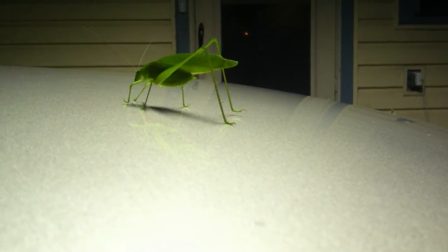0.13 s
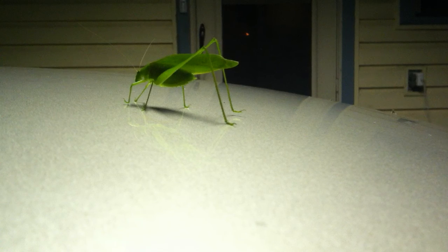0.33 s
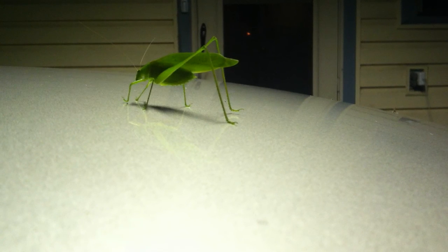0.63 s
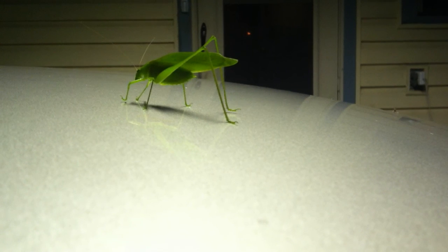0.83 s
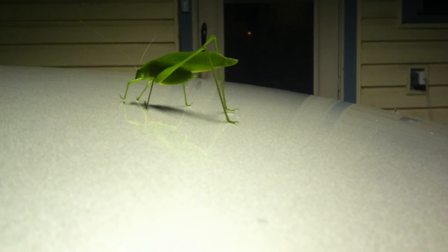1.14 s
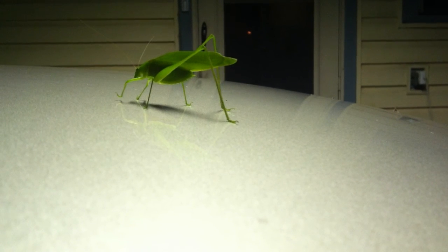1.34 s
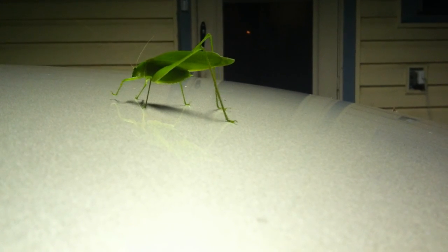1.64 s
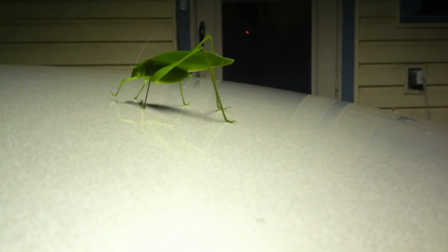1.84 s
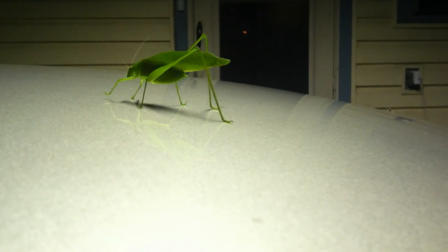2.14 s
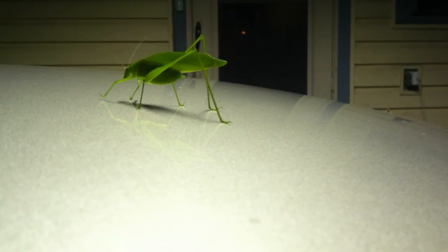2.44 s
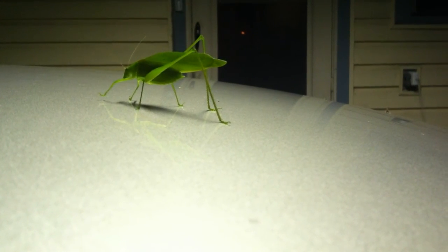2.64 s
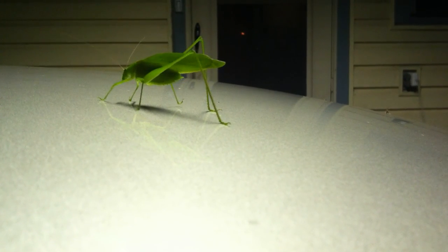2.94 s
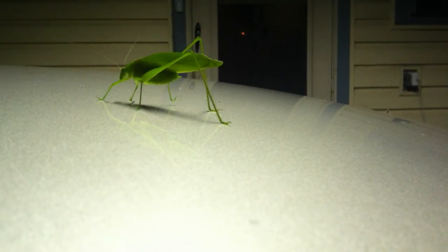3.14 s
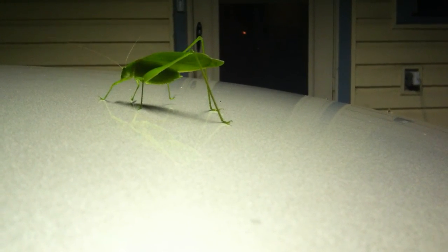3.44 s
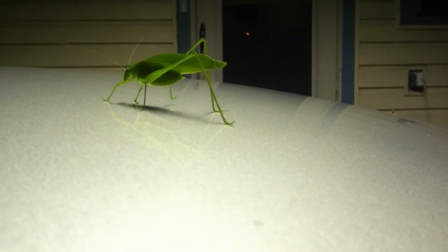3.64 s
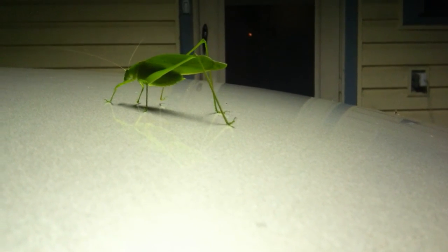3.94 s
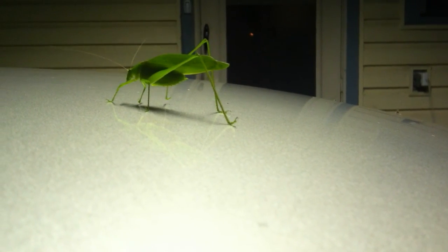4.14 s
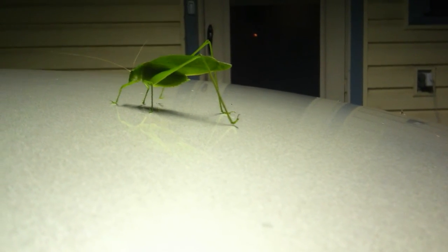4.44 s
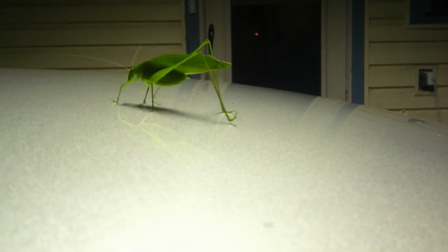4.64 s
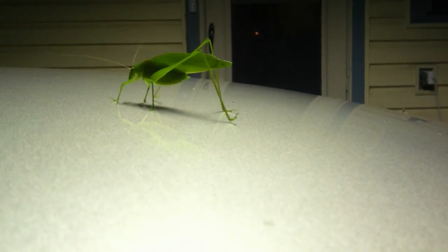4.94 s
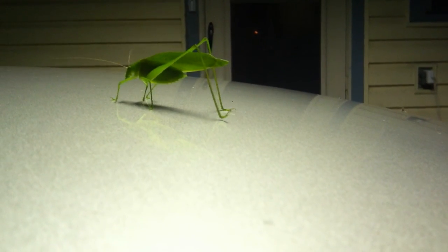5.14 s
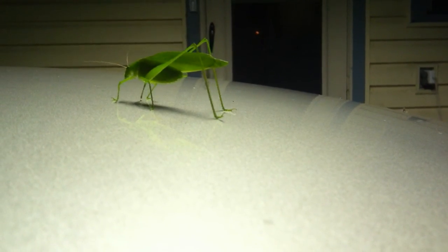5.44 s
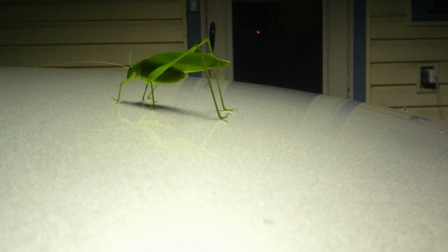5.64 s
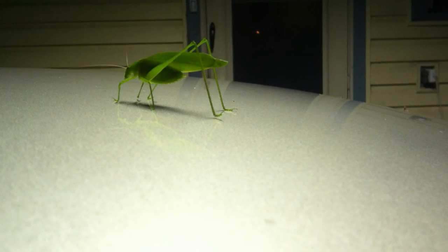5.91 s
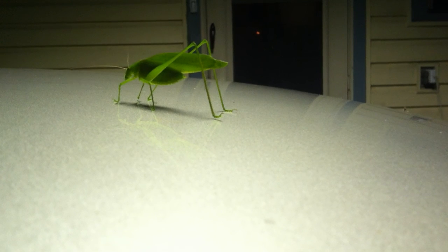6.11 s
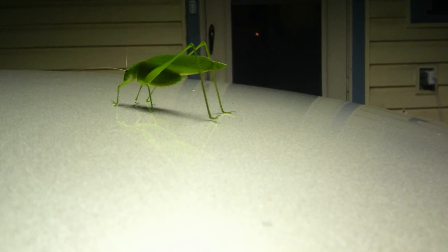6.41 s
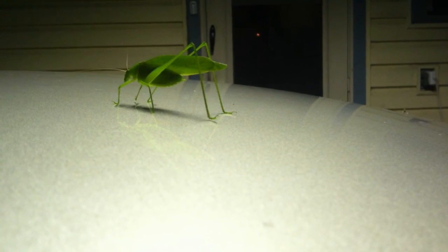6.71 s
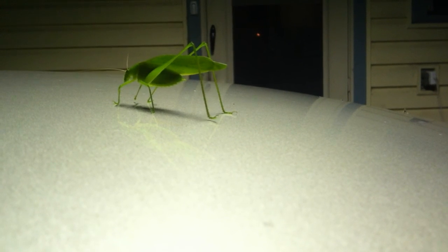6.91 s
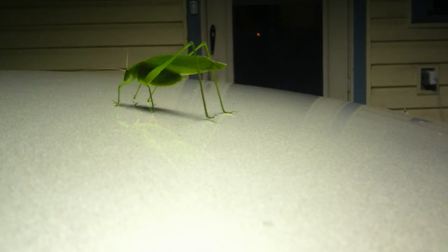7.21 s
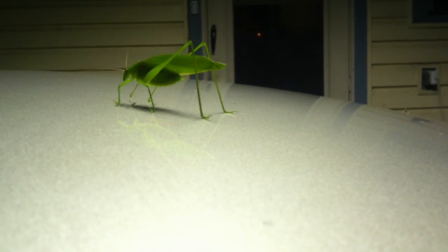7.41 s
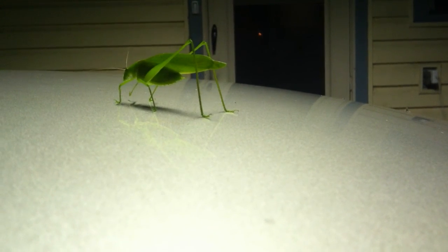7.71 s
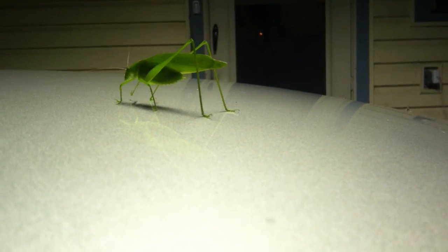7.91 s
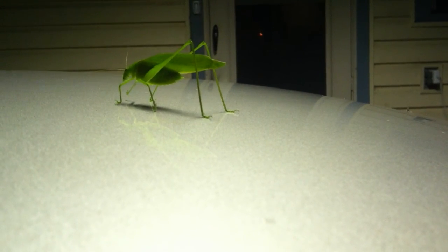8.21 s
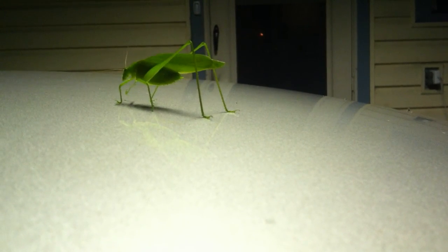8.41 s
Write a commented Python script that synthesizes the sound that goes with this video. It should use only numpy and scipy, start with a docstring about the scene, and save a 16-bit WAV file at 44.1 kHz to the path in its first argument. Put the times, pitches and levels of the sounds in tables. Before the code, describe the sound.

Katydids rasp in rhythmic bouts over a distant chorus, amid a continuous cricket shimmer, steady high chirping and occasional short electric-sounding insect buzzes at night.

```python
"""Summer night beside a wooden house

Katydids rasp in bouts from the trees, the near ones in step with a far chorus: toothed files click and ring wings.
Crickets trill without a break as trains of gliding sine tones; two insects chirp at their own pace and
another winds up a short buzz now and then: the chirps and the buzz come from pulses through wing resonances.
Under it all lie a faint machine hum of wavering sines and the rumble of the neighbourhood, filtered noise."""
import sys
import numpy as np
from scipy import signal
from scipy.fft import rfft, irfft, next_fast_len
from scipy.io import wavfile
from scipy.ndimage import uniform_filter1d

SR = 44100
rng = np.random.default_rng(int(sys.argv[2]) if len(sys.argv) > 2 else 0)


def log_audio(samples):
    """Write samples as a 16-bit WAV file to the path given in sys.argv[1]."""
    # one column per channel
    frames = np.atleast_2d(samples).T
    # limit to full scale, then quantise
    limited = np.clip(frames, -1, 1)
    pcm = np.round(limited * 32767).astype(np.int16)
    wavfile.write(sys.argv[1], SR, pcm)


N = 377496
TIME = np.arange(N) / SR  # s
EDGE_HZ = 15700

# Spectra radiated by katydid wings; only the shape counts: frequency_hz, relative_level_db
NEAR_WING_SPECTRUM = [(1200, -36), (1800, -18.5), (2000, -10), (2400, -19), (2790, -4), (2915, 4),
                      (3000, 1.5), (3080, 1.5), (3250, -6), (3600, -11.5), (3850, -6), (4080, -.5),
                      (4300, -3.5), (4430, -8), (4620, -9), (4800, -14.5), (5200, -16.5), (6000, -26),
                      (9500, -48), (12000, -35), (15500, -54)]
DEEP_WING_SPECTRUM = [(1200, -25), (1950, -22), (2085, -5), (2150, -3), (2240, -17), (2450, -10), (2550, 1),
                      (2700, -9), (2820, -21), (2940, -3.5), (3300, -7.5), (3600, -20), (3750, -6),
                      (4100, -8), (4240, 0), (4400, -9), (4650, 2.5), (4800, -7), (5400, -10.5),
                      (6000, -20), (9500, -46), (12000, -47), (15500, -39)]
FAR_WING_SPECTRUM = [(1200, -34.5), (1800, -22.5), (2040, 4), (2300, -13.5), (2800, -3.5), (3500, -12),
                     (4400, -1), (5600, -14), (8000, -46), (15500, -53)]
CHORUS_WING_SPECTRUM = [(1000, -25), (1700, -15), (2000, 1.5), (2200, -2.5), (2480, -3.5), (2740, 3.5),
                        (3080, 2.5), (3600, -6.5), (4280, 2), (5000, -1.5), (5700, -5.5), (7500, -24),
                        (10000, -35), (11800, -28), (15500, -39)]
# Wing strokes of the nearest and of a deeper-voiced katydid: middle_s, level_db (before the layer's gain)
NEAR_STROKES = [(0.049, -51), (1.119, -52), (1.212, -51.5), (1.306, -51.5), (2.214, -51.5), (2.314, -51),
                (2.401, -50), (3.266, -50.5), (3.369, -53), (3.462, -50), (4.335, -57), (4.411, -51.5),
                (4.503, -53.5), (4.595, -52.5), (5.482, -51.5), (5.573, -53), (5.661, -53.5),
                (5.755, -50.5), (7.168, -51), (7.262, -54), (7.343, -52.5), (7.442, -51)]
DEEP_STROKES = [(0.25, -51), (0.328, -51), (0.42, -50.5), (1.306, -53.5), (1.409, -50.5), (1.494, -50.5),
                (2.34, -54), (2.451, -51.5), (2.52, -53.5), (3.212, -50.5), (3.319, -54), (3.404, -50.5),
                (4.274, -54), (4.377, -50.5), (4.47, -52.5), (5.33, -51.5), (5.434, -51.5), (5.522, -52.5),
                (6.481, -52), (6.565, -50.5), (6.665, -55), (7.188, -52.5), (7.278, -52.5), (7.379, -53)]
# A katydid's short false starts before a bout: middle_s, level_db (before the layer's gain)
FALSE_STARTS = [(2.149, -48), (7.099, -47)]
# Bouts farther off: first_stroke_s, strokes (rounded), gap_s, level_db (before stroke and layer gains)
FAR_BOUTS = [(0.17, 1, .094, -52), (1.576, 2, 0.1, -54), (2.003, 1, .1, -58), (2.601, 1, .09, -57),
             (2.953, 3, 0.088, -52), (4.046, 3, 0.083, -53.5), (4.74, 3, 0.081, -59), (5.222, 1, 0.09, -54),
             (5.647, 3, 0.11, -62), (6.39, 1, 0.09, -50), (6.755, 3, 0.065, -54.5),
             (8.265, 4.8, 0.083, -52.5)]
# Swells of the distant chorus: middle_s, length_s, level_db (before the layer's gain)
CHORUS_SWELLS = [(0.355, 0.28, -63), (1.423, 0.37, -63), (2.48, 0.37, -62.5), (3.317, 0.27, -64.5),
                 (4.39, 0.38, -67.5), (5.495, 0.42, -64.5), (6.533, 0.34, -64), (7.304, 0.31, -64.5)]
# Steadier chorus that the swells add to: time_s, level_db (before the layer's gain)
CHORUS_BED = [(0, -63), (0.64, -65), (0.9, -62), (1.6, -66.5), (1.85, -63), (2.2, -65), (2.85, -65),
              (3.5, -62.5), (3.85, -68.5), (4.0, -61.5), (4.7, -62), (5.05, -64.5), (5.7, -62), (6.05, -65),
              (7.05, -65), (7.75, -62.5), (8.18, -64.5), (8.56, -63.5)]
# Trilling crickets: pitch_hz, syllables_per_s, relative_level_db
CRICKETS = [(5910, 39, -4), (6120, 65.5, 2.5), (6160, 110, -3), (6250, 81.3, -0.5), (6245, 34.5, -2),
            (6460, 30, -4.5)]
# Spectrum of the trill through the bushes: frequency_hz, relative_level_db
TRILL_SPECTRUM = [(4500, -28), (5740, -13), (5920, -5.5), (6100, -5.5), (6350, -3.5), (6550, -4),
                  (6900, -9), (8000, -25), (12000, -35)]
# Chirps of the slow, loud chirper: middle_s, length_s, level_db
SLOW_CHIRPS = [(0.03, .12, -55), (0.39, 0.18, -53), (0.71, 0.14, -54.5), (1.0, .21, -56), (1.42, .28, -55),
               (1.8, 0.28, -54.5), (2.16, 0.26, -55.5), (2.6, 0.41, -56), (2.88, 0.18, -53.5),
               (3.19, .19, -52), (3.61, .17, -52.5), (4.0, 0.23, -54.5), (4.34, .22, -54),
               (4.74, 0.24, -55), (5.03, 0.23, -56), (5.42, 0.24, -55.5), (5.83, 0.2, -56),
               (6.2, 0.23, -54), (6.54, 0.22, -54.5), (6.9, .26, -57), (7.28, .13, -53.5),
               (7.64, 0.26, -54.5), (8.0, .27, -54), (8.38, .24, -55.5)]
# Beat of the quick, thin chirper: first_chirp_s, gap_s, added_to_each_gap_s
QUICK_BEAT = (0.159, 0.217, 0.00013)
# Buzzes that swell and break off: start_s, end_s, top_level_db (before the treble is dulled)
BUZZES = [(1.92, 2.13, -64), (2.66, 2.858, -70), (3.118, 3.49, -55), (5.66, 5.89, -67), (6.77, 7.04, -54.5)]
# Wing spectra of the chirpers and the buzzer: frequency_hz, relative_level_db
SLOW_WING_SPECTRUM = [(5400, -37), (5780, -15), (5950, -3), (6100, 3.5), (6200, 1.5), (6320, 11),
                      (6430, 4.5), (6520, -9), (6620, -10), (6800, -14.5), (7600, -49.5)]
QUICK_WING_SPECTRUM = [(7000, -41), (8100, -16), (8470, 4.5), (8800, -9), (9300, -9), (10500, -47)]
BUZZ_WING_SPECTRUM = [(5700, -33), (6300, -7), (6500, -6), (6560, 9), (6605, -5), (6645, 4), (6685, -9.5),
                      (6732, 6), (6780, -4), (6826, 12), (6865, -5.5), (6900, 6), (6930, 0), (6958, 5),
                      (7020, -5), (7083, 3), (7160, -16), (7225, 0), (7360, -16), (7450, -12), (7700, -22),
                      (8300, -26), (11000, -54)]
# Spectra of the neighbourhood rumble and of the roar: frequency_hz, relative_level_db
RUMBLE_SPECTRUM = [(20, -22), (45, -33), (70, -20), (100, -15.5), (135, -4.5), (165, 1), (220, -0.5),
                   (300, -4), (550, -11), (1100, -16.5), (1700, -15), (4000, -21.5), (8500, -26.5),
                   (10500, -41), (15500, -57)]
ROAR_SPECTRUM = [(100, -24), (230, -6), (380, 3), (600, -2.5), (1100, -17), (3000, -42)]
# A soft low roar of wind or far traffic that comes and goes: time_s, level_db
ROAR_LEVEL = [(0, -76), (2.5, -90), (4.2, -83), (4.85, -68), (5.25, -65.5), (5.55, -79), (7.9, -79.5),
              (8.56, -66)]
# Machine hum: frequency_hz, level_db, waver (rms share of the frequency)
HUM = [(120, -77.5, 0.0024), (155.2, -76.5, 0.0063), (239.4, -74.5, 0.0013), (480, -79.5, 0.008),
       (660, -87.5, 0.00097)]


def katydid(rows, wing, length, teeth_per_s, jitter, wet, t60, level_db):
    """Stridulation: each stroke drags the file's teeth over the scraper and rings the leathery wing."""
    clicks = strikes(teeth_per_s, jitter, uneven_db=1.5)
    rasp = steadied(ringing(clicks, wing), span_s=0.007)
    sung = rasp * strokes(rows, length, lead=0.0028)
    return gain_of(level_db) * scattered(sung, wet, t60, count=8)


def wing_note(rows, hz, waver, length, wet, level_db):
    """Sharp resonance: the deep katydid's wing adds one narrow, slightly unsteady note to each stroke."""
    pitch = hz * (1 + waver * drift(170))
    note = np.sqrt(2) * np.sin(2 * np.pi * np.cumsum(pitch) / SR)
    sung = note * strokes(rows, length, lead=0.002)
    return gain_of(level_db) * scattered(sung, wet, t60=0.15, count=8)


def bouts(rows, level_slope_db, first_stroke_db):
    """Rhythmic grouping: evenly spaced strokes, with a level step per stroke and one for the first; (s, dB) rows."""
    stroke_rows = []
    for first, count, gap, db in rows:
        for k in range(round(count)):
            slope_db = level_slope_db * (k - (count - 1) / 2)
            stroke_rows.append((first + k * gap, db + slope_db + first_stroke_db * (k == 0)))
    return stroke_rows


def chorus(level_db, throb_db, strokes_per_s):
    """Incoherent summation: many far katydids swell together, their strokes out of step."""
    voices = np.zeros(N)
    for pace in np.linspace(.92, 1.08, num=6):
        stroke_rate = strokes_per_s * pace * (1 + 0.06 * drift(1.983))
        beat = np.cumsum(stroke_rate) / SR + rng.random()
        throb = gain_of(throb_db * np.sin(2 * np.pi * beat))
        voices += strikes(420 * pace, jitter=.3, uneven_db=2.5) * throb
    spread = scattered(voices - voices.mean(), wet=0.36, t60=0.17, sway_per_s=40, count=16)
    wash = ringing(spread, CHORUS_WING_SPECTRUM)
    swells = sum(strokes([(s, db)], length, lead=0) for s, length, db in CHORUS_SWELLS)
    bed = gain_of(np.interp(TIME, *np.transpose(CHORUS_BED)))
    return gain_of(level_db) * wash * (bed + swells)


def trill(level_db, glide, sharpness, wet, waver_db):
    """Amplitude and frequency modulation: each wing closure is a falling tone, smeared by the bushes."""
    voices = np.zeros(N)
    for hz, per_s, db in CRICKETS:
        cycle = (np.cumsum(per_s * (1 + .025 * drift(5))) / SR + rng.random()) % 1
        pitch = hz * (1 + glide * (.5 - cycle) + .013 * drift(450))
        syllables = np.sin(np.pi * cycle) ** (2 * sharpness)
        tone = np.sin(2 * np.pi * np.cumsum(pitch) / SR)
        voices += gain_of(db) * evened(syllables * tone)
    song = coloured(scattered(voices, wet, t60=0.37, sway_per_s=90, count=6), TRILL_SPECTRUM)
    even = steadied(song, span_s=0.022)
    return gain_of(level_db + waver_db * drift(16)) * even


def chirper(rows, wing, pulses_per_s, wet, linger):
    """Resonant excitation: bursts of even pulses ring a narrow wing and die away among the trees."""
    pulses = strikes(pulses_per_s, jitter=.06, uneven_db=0.5)
    ring = scattered(ringing(pulses, wing), wet, t60=0.4, sway_per_s=40)
    pressure = sum(strokes([(s, db)], length, lead=0.012) for s, length, db in rows)
    # The burst's power decays with the time constant linger (s)
    keep = np.exp(-1 / (linger * SR))
    power = signal.lfilter([1 - keep], [1, -keep], pressure ** 2)
    return steadied(ring, span_s=0.027) * np.sqrt(power)


def chirps(beat, length, level_db, uneven_db, stray_s):
    """Slowing pulse: chirps on a lengthening beat, uneven in time and force; (s, length s, dB) rows."""
    first, gap, slowing = beat
    k = np.arange(int(TIME[-1] / gap) + 1)
    late, force = rng.standard_normal((len(k), 2)).T
    middle = first + k * (gap + slowing * k / 2) + stray_s * late
    return np.column_stack([middle, np.full(len(k), length), level_db + uneven_db * force])


def buzzer(pulses_per_s, rise_db, release, bright_hz, dulling_per_khz):
    """Force-dependent brightness: a fast pulse train gains force and treble in an arch, then dies away."""
    force = np.zeros(N)
    for start, end, db in BUZZES:
        to_go = np.clip((end - TIME) / (end - start), 0, 2)
        dying = np.clip((TIME - end) / release, 0, 20)
        force += gain_of(db - rise_db * to_go ** 2.6) * np.exp(1 - np.hypot(1, dying))
    pulses = strikes(pulses_per_s, jitter=0.12, uneven_db=0.0)
    pulses = scattered(pulses, wet=0.5, t60=0.055, sway_per_s=60, count=8)
    ring = steadied(ringing(pulses, BUZZ_WING_SPECTRUM), span_s=0.012)
    # The weaker the force, the more the treble above bright_hz is dulled
    hz, t, z = signal.stft(ring, SR, nperseg=256)
    above_khz = np.maximum(hz - bright_hz, 0)[:, None] / 1000
    z = z * np.interp(t, TIME, force / force.max()) ** (dulling_per_khz * above_khz)
    return force * signal.istft(z, SR, nperseg=256)[1][:N]


def neighbourhood(rumble_db):
    """Broadband noise and tones: an even low rumble, a far roar that comes and goes, a wavering machine hum."""
    rumble = gain_of(rumble_db) * coloured(rng.standard_normal(N), RUMBLE_SPECTRUM)
    roar_gain = gain_of(np.interp(TIME, *np.transpose(ROAR_LEVEL)))
    roar = roar_gain * coloured(rng.standard_normal(N), ROAR_SPECTRUM)
    hum = np.zeros(N)
    for hz, db, waver in HUM:
        turns = np.cumsum(hz * (1 + waver * drift(14))) / SR
        hum += gain_of(db) * evened(gain_of(0.6 * drift(11.0)) * np.sin(2 * np.pi * turns))
    return rumble + roar + hum


def strikes(per_s, jitter, uneven_db):
    """Impulsive excitation: clicks of a scraper running over a file at a slightly unsteady speed."""
    gap, force = rng.standard_normal(size=(2, 8192))
    at = np.cumsum(np.maximum(1 + jitter * gap, .1)) * SR / per_s
    heard = at < N
    return np.bincount(at[heard].astype(int), gain_of(uneven_db * force[heard]), minlength=N)


def strokes(rows, length, lead):
    """Amplitude envelope: a round-shouldered swell, centred lead s early, for each (s, dB) row."""
    pressure = np.zeros(N)
    for s, db in rows:
        begin = max(int((s - lead - length) * SR), 0)
        end = max(int((s - lead + length) * SR), 0)
        offset = TIME[begin:end] - s + lead
        pressure[begin:end] += gain_of(db) * np.exp(-abs(2 * offset / length) ** np.pi)
    return pressure


def ringing(x, points):
    """Minimum-phase resonance: each click starts sharply and dies away, by (Hz, dB) points; rms 1."""
    hz, db = np.transpose(points)
    log_hz = np.log(abs(np.fft.fftfreq(8192, 1 / SR)) + 1)
    log_gain = np.log(gain_of(np.interp(log_hz, np.log(hz), db)))
    # The Hilbert transform of the log gain gives the phase
    response = np.fft.ifft(np.exp(np.conj(signal.hilbert(log_gain)))).real
    return evened(signal.oaconvolve(x, response[:len(response) // 2])[:N])


def scattered(x, wet, t60, sway_per_s=12, count=4):
    """Multipath scattering: direct sound plus weak echoes off leaves and walls on shifting paths; keeps energy."""
    t = TIME[:SR // 3]
    present = rng.random((count, len(t))) < 2000 / SR  # about 2000 echoes per s
    taps = rng.standard_normal((count, len(t))) * present
    taps *= np.exp(-np.log(1000) * t / t60)  # down 60 dB after t60 s
    taps /= np.linalg.norm(taps, axis=1, keepdims=True)
    shares = np.array([drift(sway_per_s) for _ in taps])
    shares /= np.linalg.norm(shares, axis=0)
    echoes = signal.oaconvolve(x * shares, taps, axes=1)[:, :N].sum(0)
    wet = np.clip(wet, 0, 1)
    return np.sqrt(1 - wet) * x + np.sqrt(wet) * echoes


def coloured(x, points):
    """Linear filtering: shapes the spectrum by (Hz, dB) points; rms 1."""
    hz, db = np.transpose(points)
    size = next_fast_len(N, real=True)
    log_hz = np.log(np.fft.rfftfreq(size, 1 / SR) + 1)
    gain = gain_of(np.interp(log_hz, np.log(hz), db))
    return evened(irfft(rfft(x, size) * gain, size)[:N])


def steadied(x, span_s):
    """Short-time power normalization: evens the loudness over span_s, keeps finer grain; rms about 1."""
    size = max(int(span_s * SR), 2)
    power = uniform_filter1d(uniform_filter1d(x ** 2, size), size)
    return x / np.sqrt(abs(power) + 1e-12)


def drift(per_s):
    """Random modulation: a fluctuation of rms 1 with per_s new random values a second."""
    knots = rng.standard_normal(4096)
    return evened(np.interp(TIME * per_s, np.arange(len(knots)), knots))


def evened(x):
    """Power normalization: scales to rms 1."""
    return x / np.sqrt(np.mean(x ** 2) + 1e-20)


def gain_of(db):
    """Logarithmic level: decibels to amplitude."""
    return np.exp(np.asarray(db) * np.log(10) / 20)


def scene():
    """Superposition: all the singers over the night's floor."""
    near = katydid(NEAR_STROKES, NEAR_WING_SPECTRUM, length=0.059, teeth_per_s=440, jitter=.18,
                   wet=0.24, t60=0.28, level_db=0.8)
    false_starts = katydid(FALSE_STARTS, NEAR_WING_SPECTRUM, length=0.0094, teeth_per_s=550, jitter=.18,
                           wet=0.22, t60=.2, level_db=-3.0)
    deep = katydid(DEEP_STROKES, DEEP_WING_SPECTRUM, length=0.055, teeth_per_s=425, jitter=.18,
                   wet=0.3, t60=0.17, level_db=-3.5)
    deep += wing_note(DEEP_STROKES, hz=2128, waver=0.0221, length=0.05, wet=.1, level_db=-5.5)
    # Apart from a softer first stroke, each far stroke is a little softer than the one before
    far_strokes = bouts(FAR_BOUTS, level_slope_db=-0.5, first_stroke_db=-1.5)
    far = katydid(far_strokes, FAR_WING_SPECTRUM, length=0.064, teeth_per_s=420, jitter=.25,
                  wet=0.6, t60=0.23, level_db=-2.5)
    distant = chorus(level_db=6.0, throb_db=2, strokes_per_s=10.6)
    crickets = trill(level_db=-53.5, glide=0.086, sharpness=2.0, wet=0.39, waver_db=0.6)
    slow = chirper(SLOW_CHIRPS, SLOW_WING_SPECTRUM, pulses_per_s=187, wet=0.47, linger=0.0098)
    quick_chirps = chirps(QUICK_BEAT, length=0.105, level_db=-78.5, uneven_db=.6, stray_s=.006)
    quick = chirper(quick_chirps, QUICK_WING_SPECTRUM, pulses_per_s=150, wet=0.72, linger=.012)
    buzz = buzzer(pulses_per_s=113, rise_db=24, release=0.032, bright_hz=6700, dulling_per_khz=.6)
    floor = neighbourhood(rumble_db=-61.5)
    katydids = near + false_starts + deep + far + distant
    return (katydids + crickets + slow + quick + buzz + floor)[None]


def record(dry):
    """Band limitation: a linear-phase low-pass filter with its edge at EDGE_HZ."""
    low_pass = signal.firwin(511, EDGE_HZ, window=("kaiser", 9), fs=SR)
    return signal.oaconvolve(dry, low_pass[None], "same")


dry = scene()
out = record(dry)
log_audio(out)
```